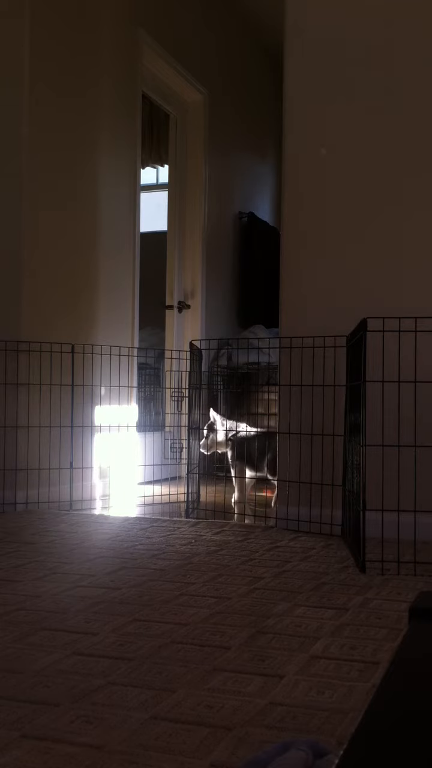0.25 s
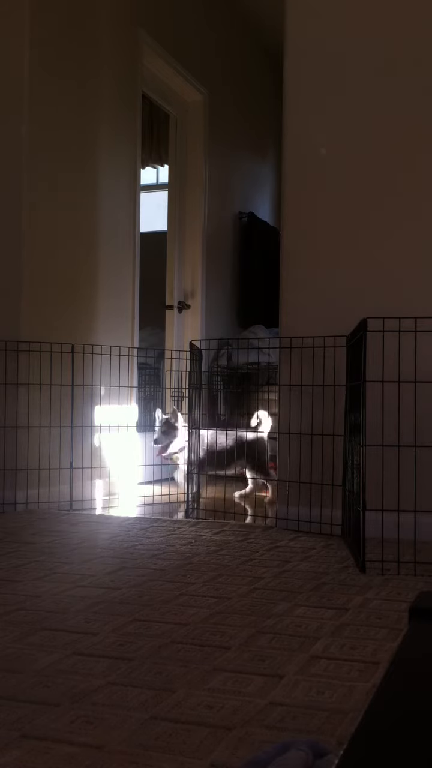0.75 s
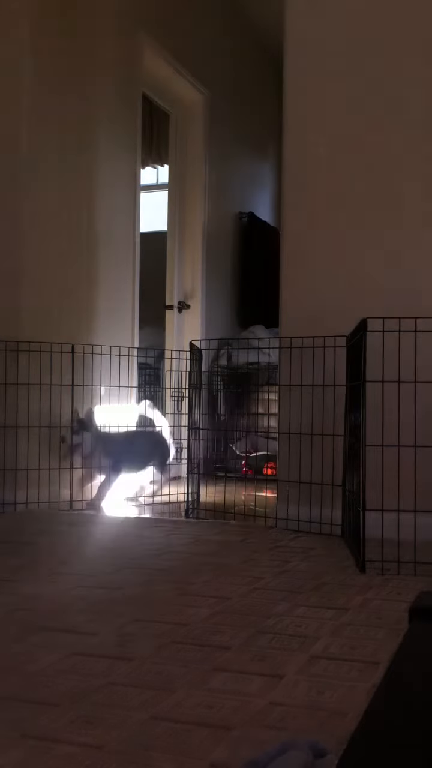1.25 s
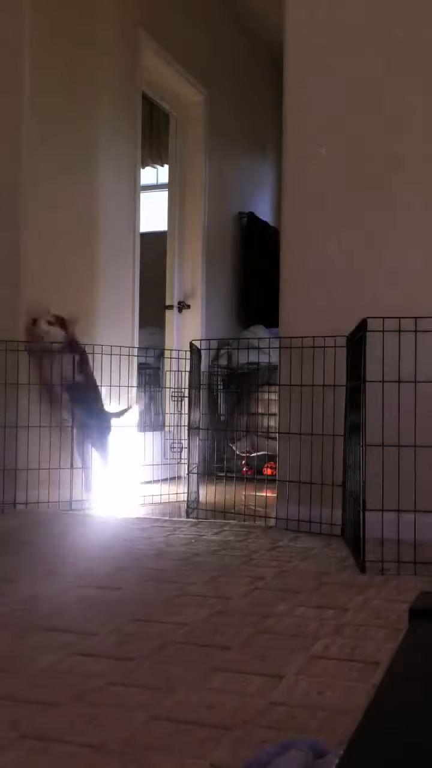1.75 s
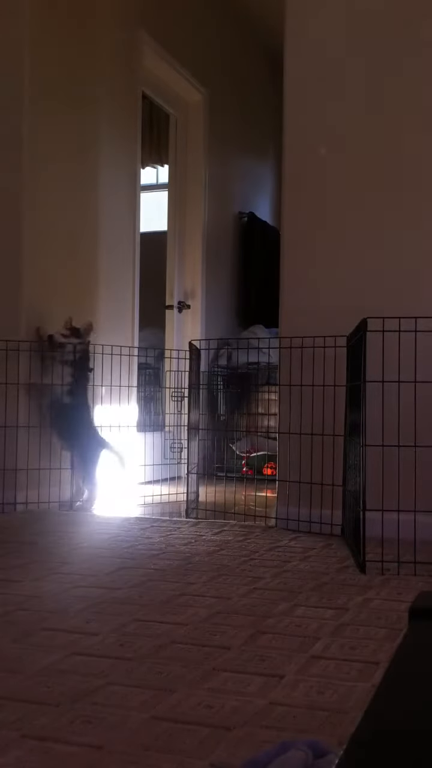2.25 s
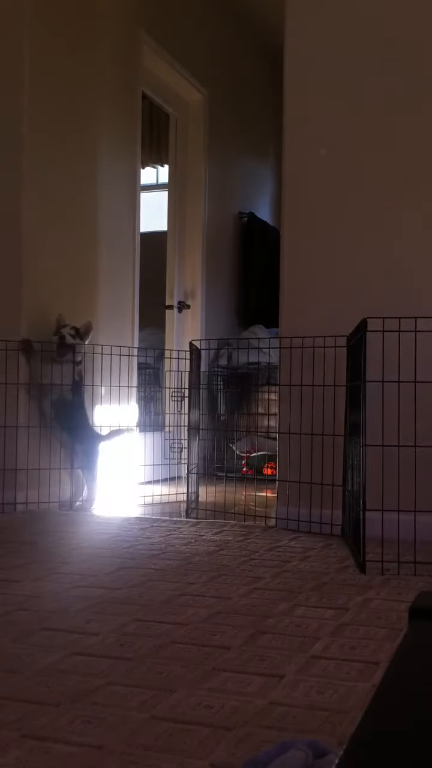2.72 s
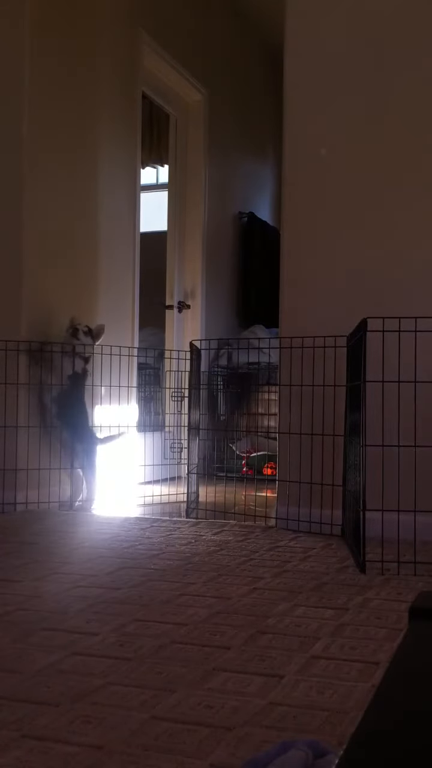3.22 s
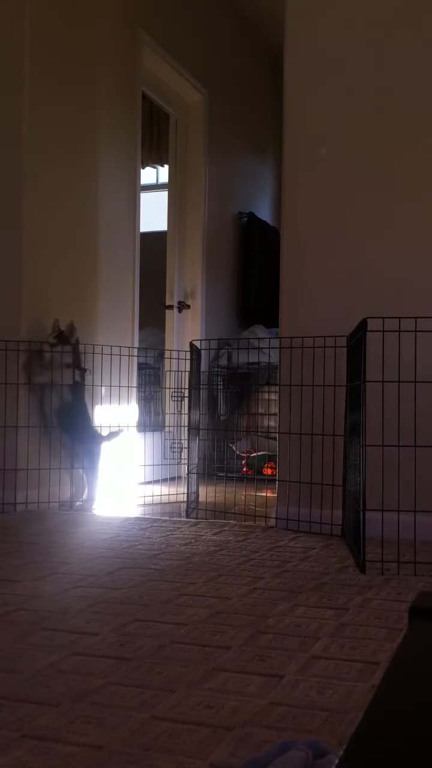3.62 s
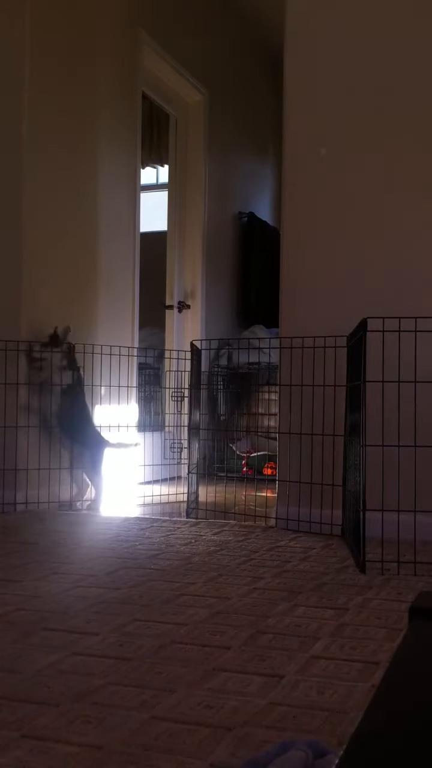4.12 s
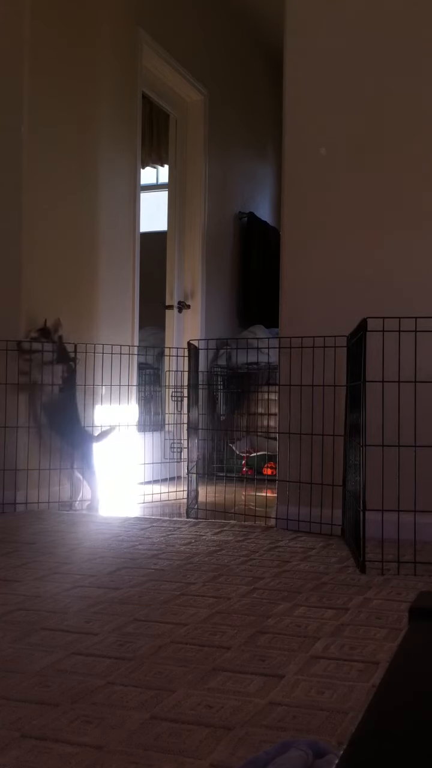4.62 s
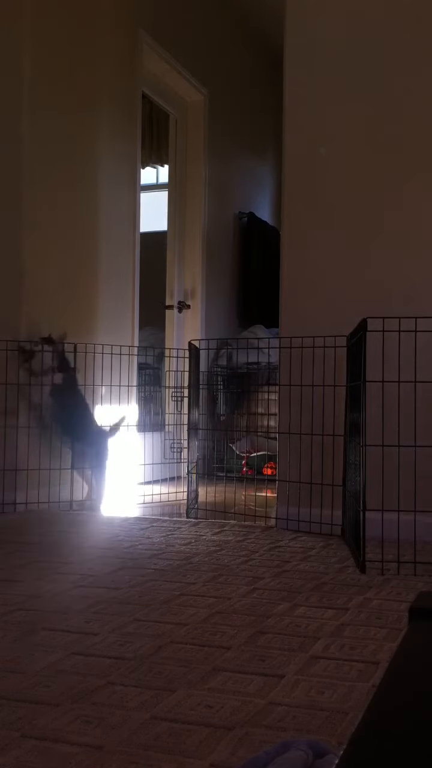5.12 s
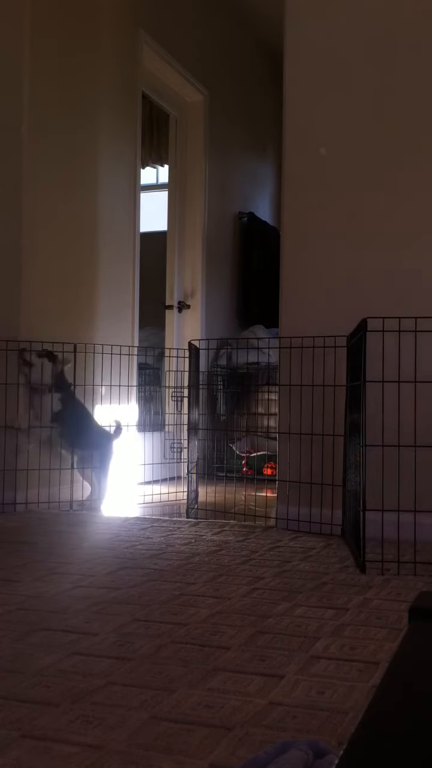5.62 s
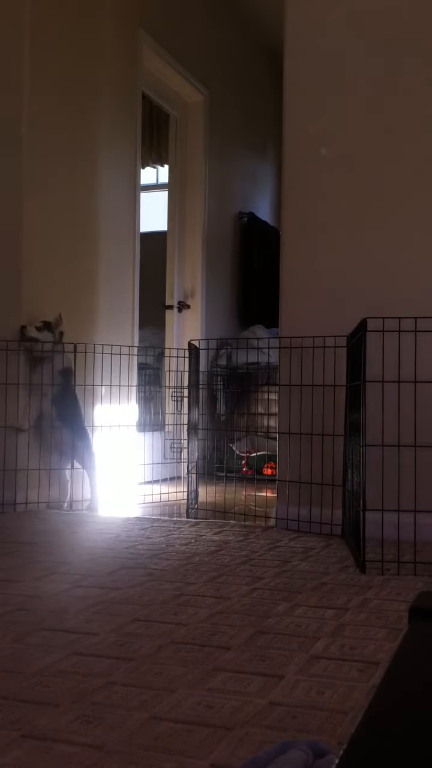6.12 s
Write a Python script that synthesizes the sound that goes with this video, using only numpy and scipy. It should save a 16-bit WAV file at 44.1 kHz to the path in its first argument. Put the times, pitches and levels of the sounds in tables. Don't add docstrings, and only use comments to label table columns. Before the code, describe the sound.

A puppy barks, yelps and whines in an echoing hard-walled hall, its claws faintly ticking on a wire pen over quiet house hum.

```python
import sys
import numpy as np
from scipy import signal
from scipy.fft import rfft, irfft
from scipy.io import wavfile
from scipy.ndimage import uniform_filter1d

SR = 44100
rng = np.random.default_rng(int(sys.argv[2]) if len(sys.argv) > 2 else 0)


def invert_db(level):
    return 10 ** (np.asarray(level, dtype=float) / 20)


def waveform_to_disk(signal):
    frames = np.transpose(np.atleast_2d(signal))
    scaled = np.clip(frames, -1, 1) * 32767
    samples = np.round(scaled).astype(np.int16)
    wavfile.write(sys.argv[1], SR, samples)


N = 280476

# frequency [Hz], gain [dB].
THROAT_GAIN = [(350, -22.5), (520, -25.5), (720, -7.5), (1050, -9.5), (1300, 6), (1800, -2.5), (2350, -6.5),
               (2850, -7.5), (3400, -5.5), (4300, -12.5), (5000, -30.5), (5900, -30), (8300, -25.5),
               (15600, -34.5)]
# start [s], length [s], start pitch [Hz], top pitch [Hz], level [dB].
BARKS = [
    (-.02, 0.16, 538.7, 632.5, -19.5),
    (0.43, .11, 437.2, 800, -28),
    (2.623, 0.061, 637, 694, -38),
    (2.852, 0.084, 480, 701, -12.5),
    (3.37, 0.064, 649.6, 715.5, -32.5),
    (3.75, 0.077, 441, 591, -40),
    (3.999, 0.095, 523, 696.5, -30.5),
    (4.671, 0.078, 562.8, 672.5, -21.5),
    (4.917, 0.14, 350.8, 749.7, -15.5),
    (5.616, .16, 329.9, 690.7, -16),
]
# roughness [0-1], mouth brightness [dB per octave],
# share of the pitch climb left after the swell [0-1].
BARK_VOICING = [(.62, 2.5, .3), (0.35, 2, .75), (1, -3.5, 0.32), (0.39, 3, 0.1045), (0.53, -2, 0.08),
                (0.53, -12.5, 0.39), (0.44, -3.5, 0.63), (0.56, 0, 0.091), (0.63, 5, .3), (0.53, 1, .45)]
# band centre [Hz], t60 [s].
HALL_DECAY = [(125, 0.97), (250, 0.97), (500, 0.18), (1000, 0.55), (2000, 0.49), (4000, 0.49), (8000, 0.5),
              (16000, 0.15)]
# frequency [Hz], level [dB], t60 [s].
STANDING_WAVES = [(767, -28.5, 0.46), (794, -28, 0.35), (1180, -31.5, 0.22), (1286, -41, 0.36),
                  (1396, -36.5, 0.3), (1472, -36, 0.59), (1540, -28.5, 0.17), (1835, -32.5, 0.51),
                  (1930, -34.5, 0.33), (2426, -29.5, 0.2), (3333, -30, 0.14)]
# frequency [Hz], density [dB per Hz].
HOUSE_SPECTRUM = [(15, -57), (30, -41.5), (70, -23), (119, -1), (240, -4), (331, -10.5), (422, -14),
                  (764, -13), (922, -14), (1000, -18.5), (2120, -20.5), (2300, -24), (15600, -37.5)]
# start [s], length [s], start pitch [Hz], end pitch [Hz], level [dB].
WHISTLES = [(0.093, 0.064, 8600, 8630, -41), (0.487, 0.016, 8600, 8750, -51),
            (1.841, 0.011, 8200, 8770, -44.5), (2.155, 0.042, 8470, 8400, -43.5),
            (2.961, 0.029, 8930, 8530, -34), (3.161, 0.045, 8230, 8920, -32.5),
            (3.181, 0.024, 8800, 9760, -52), (3.186, 0.061, 7820, 7540, -48),
            (3.417, 0.029, 8490, 8250, -37), (3.53, .07, 8400, 8600, -58), (3.786, 0.05, 8150, 8650, -50),
            (4.59, 0.041, 8270, 8400, -56), (4.732, 0.022, 7870, 9500, -41.5),
            (5.018, 0.054, 8460, 8690, -33), (5.429, 0.03, 8200, 8900, -44),
            (5.761, 0.064, 8600, 8960, -39), (6.256, 0.051, 8560, 8680, -39.5),
            (6.314, 0.028, 8750, 9170, -37)]
# start [s], length [s], level [dB], brightness [dB per octave].
CLAWS = [(1.136, 0.068, -71, -5), (1.389, 0.0043, -47, 0), (1.412, 0.038, -56.5, -1.5),
         (1.594, .04, -62.5, -5.5), (1.681, 0.043, -42.5, 0.5), (1.714, 0.072, -50, -0.5),
         (1.823, 0.039, -45.5, 2), (1.943, 0.044, -48, -1), (2.092, 0.034, -48.5, -1.5),
         (2.127, 0.12, -47, 3.5), (2.421, 0.21, -46, -3), (2.489, 0.099, -55.5, -6.5),
         (2.624, 0.15, -51, -3.5), (3.284, 0.24, -56.5, -4.5), (3.559, 0.0075, -44.5, -0.5),
         (3.67, 0.039, -50, 1.5), (3.866, 0.018, -51, -3.5), (4.143, 0.059, -52, 3),
         (4.276, 0.094, -45, -0.5), (4.552, 0.07, -55.5, -5)]
# frequency [Hz], level [dB], t60 [s].
WIRE_MODES = [(2990, -7, 0.054), (3710, -4, 0.039), (5030, 3, 0.005), (7320, 2, 0.0088),
              (11500, -27, 0.027), (13260, -28.5, 0.0092)]
# start [s], body frequency [Hz], level [dB].
PAWS = [(1.759, 208, -47.5), (1.765, 815, -55.5), (1.849, 298, -52.5), (2.145, 221, -43.5),
        (2.192, 330, -53.5), (2.435, 223, -47.5), (2.769, 280, -53), (2.931, 209, -53.5),
        (3.285, 208, -50.5), (3.566, 325, -57.5), (4.15, 191, -45), (4.581, 307, -72)]
# time [s], pitch [Hz], level [dB].
CRIES = [
    [(3.065, 1764, -45.5), (3.092, 1774, -26), (3.108, 1577, -24), (3.13, 1652, -20), (3.162, 1978, -31),
     (3.19, 2376, -36)],
    [(5.203, 1581, -16), (5.225, 1618, -18), (5.24, 1829, -22), (5.28, 1930, -26), (5.31, 1753, -21)],
    [(5.312, 1264, -20), (5.325, 1180, -15.5), (5.343, 1201, -11), (5.385, 1325, -15), (5.405, 1410, -19),
     (5.425, 1665, -37.5), (5.455, 1826, -25.5)],
    [(5.918, 1216, -38.5), (5.975, 1160, -18.5), (6.005, 1180, -24.5), (6.045, 1267, -19),
     (6.08, 1198, -25), (6.135, 1068, -23), (6.19, 1139, -21.5), (6.245, 1185, -31), (6.285, 1392, -14.5)],
]
# roughness [0-1], brightness [dB per octave].
CRY_VOICING = [(0.18, 4), (0.25, 9), (0.02, 0.5), (0.03, 0)]
# start [s], length [s], start pitch [Hz], end pitch [Hz], level [dB].
YELPS = [
    (3.421, 0.014, 1142, 1234, -24.5),
    (3.424, 0.052, 1785, 1896, -32),
    (3.801, 0.043, 1561, 1618, -34),
    (5.089, 0.073, 1830, 1430, -25.5),
    (5.158, 0.044, 1247, 1300, -16.5),
    (5.747, 0.0345, 1795, 1744, -22.5),
    (5.852, 0.095, 1326, 1362, -32.5),
    (6.27, .05, 1627, 1764, -27.5),
]
# roughness [0-1], brightness [dB per octave].
YELP_VOICING = [(0.5, -8.5), (0.49, -2), (0.3, -7), (0.16, 9), (0, 8.5), (0, -1), (0.2, 9), (0, 1)]


def curve(table, hz):
    table_hz, db = np.transpose(table)
    return np.interp(np.log(np.maximum(hz, 1)), np.log(table_hz), db)


def low_cut(f, hz, db_per_octave):
    return -db_per_octave * np.log2(np.maximum(hz / (f + 1), 1))


def high_cut(f, hz, db_per_octave):
    return -db_per_octave * np.log2(np.maximum(f / hz, 1))


def unit(x):
    return x / np.sqrt(np.mean(x ** 2))


def tinted(x, db_of):
    return irfft(rfft(x) * invert_db(db_of(np.fft.rfftfreq(len(x), 1 / SR))), len(x))


def wobble(count, rate_hz):
    width = int(SR / rate_hz)
    return unit(uniform_filter1d(uniform_filter1d(rng.standard_normal(count), width), width))


def add(track, start_s, sound):
    i = int(start_s * SR)
    track[i:i + len(sound)] += sound[:len(track) - i]


def call(rows):
    lowest_hz, highest_hz, flutter_db = 400, 5300, 9
    times_s, *columns = np.transpose(rows)
    chance = int(.6 * SR)
    t = times_s[0] + np.arange(int((times_s[-1] - times_s[0]) * SR)) / SR
    count = len(t)
    hz, db, rough, bright = (np.interp(t, times_s, c) for c in columns)
    rough = np.clip(rough, 0, 1)

    drift = 1 + .04 * rough * wobble(chance, 120)[:count]
    turns = np.cumsum(hz * drift) / SR + .12 * rough * wobble(chance, 700)[:count]
    k = np.arange(1, 31)[:, None] / 2
    overtone_hz = k * hz
    gain = invert_db(curve(THROAT_GAIN, overtone_hz) + bright * np.log2(overtone_hz / 1500))
    gain *= overtone_hz < 1.2 * highest_hz
    gain *= np.where(k % 1, .9 * rough ** 2, 1)
    flutter = np.array([wobble(chance, 39)[:count] for _ in k])
    gain *= invert_db(flutter_db * rough * np.minimum(k / 3, 1) * flutter)
    tone = (gain * np.sin(2 * np.pi * (k * turns + k * k / 7))).sum(axis=0)
    tone /= np.sqrt((gain ** 2).sum(axis=0) / 2)

    air = rng.standard_normal(chance)
    breath = unit(tinted(air, lambda f: curve(THROAT_GAIN, f) + low_cut(f, 2200, 14)))[:count]
    breath *= .5 * rough * (1 + 0.093 * np.cos(2 * np.pi * turns))
    hiss = unit(tinted(air, lambda f: np.where(f > 5700, curve(THROAT_GAIN, f), -120)))[:count]
    hiss *= invert_db(-26) * (0.32 + rough)

    edge_s = 0.0071
    shape = invert_db(db) * np.clip(np.minimum(t - times_s[0], times_s[-1] - t) / edge_s, 0, 1)
    voiced = np.pad(shape * (tone + breath), (0, 500))
    voiced = tinted(voiced, lambda f: low_cut(f, lowest_hz, 30) + high_cut(f, highest_hz, 150))
    return voiced[:count] + shape * hiss


def bark(start_s, length_s, start_hz, top_hz, db, rough, bright, climb):
    swell_s, rise, hold = .028, .35, .3
    after_s = (length_s - swell_s) * np.array([0, rise, rise + hold, 1])
    times_s = start_s + np.append(0, swell_s + after_s)
    hz = top_hz - (top_hz - start_hz) * np.array([1, climb, climb / 2, climb / 6, 0.079])
    level_db = db + np.array([-27.5, -5.5, 0, 2.5, -19])
    mouth = bright + np.array([-7.5, 0, 0, 0, 6.2])
    roughness = rough * (1 - 0.37 * (times_s - start_s) / length_s)
    return np.transpose([times_s, hz, level_db, roughness, mouth])


def hall(dry):
    build_s, direct_db = 0.0015, -2
    t = np.arange(SR) / SR
    noise = rng.standard_normal(SR)
    tail = np.zeros(SR)
    for hz, t60_s in HALL_DECAY:
        band = tinted(noise, lambda f: 20 * np.log10(np.clip(1 - np.abs(np.log2((f + 1) / hz)), 1e-5, 1)))
        tail += band * 1000. ** (-t / t60_s)
    tail *= 1 - np.exp(-t / build_s)
    power = uniform_filter1d(np.abs(rfft(tail)) ** 2, size=90)
    tail = tinted(tail, lambda f: -10 * np.log10(power + 1e-9))
    tail *= t < .8
    for hz, db, t60_s in STANDING_WAVES:
        tail += invert_db(db) * np.sin(2 * np.pi * hz * t) * 1000. ** (-t / t60_s) / 10
    tail[0] += invert_db(direct_db)
    return signal.fftconvolve(dry, tail)[:N]


def house():
    hush = tinted(rng.standard_normal(N), lambda f: curve(HOUSE_SPECTRUM, f))
    sway_db = .7 * wobble(N, 5)
    return invert_db(-58.5 + sway_db) * unit(hush)


def nose_whistle(length_s, start_hz, end_hz, db):
    u = np.linspace(0, 1, int(length_s * SR))
    hz = (start_hz + (end_hz - start_hz) * u) * (1 + .007 * wobble(SR // 4, 220)[:len(u)])
    return invert_db(db) * np.sin(np.pi * u) ** .5 * np.sin(2 * np.pi * np.cumsum(hz) / SR)


def claw(length_s, db, bright):
    t = np.arange(SR // 5) / SR
    noise, size = rng.standard_normal(len(t)), rng.exponential(1, len(t))
    ticks = unit(noise * invert_db(2.5 * size))
    ticks *= np.exp(-(t / length_s) ** 2) * np.minimum(t / (.3 * length_s), 1)
    ring = np.zeros(len(t))
    for hz, ring_db, t60_s in WIRE_MODES:
        tuned_hz = hz * (1 + 0.043 * rng.standard_normal())
        ring += invert_db(ring_db) * np.sin(2 * np.pi * tuned_hz * t) * 1000. ** (-t / t60_s)
    scrape = ticks + invert_db(-29.0) * signal.fftconvolve(ticks, ring)[:len(t)]
    return invert_db(db) * tinted(scrape, lambda f: bright * np.log2(np.maximum(f, 300) / 4000)
                            + low_cut(f, 500, 12) + high_cut(f, 11500, 14))


def paw(body_hz, db):
    t = np.arange(SR // 5) / SR
    knock = rng.standard_normal(len(t)) * np.exp(-t / 0.062) * np.minimum(t / 0.0015, 1)
    thud = tinted(knock, lambda f: -9 * np.abs(np.log2((f + 1) / body_hz)) + low_cut(f, 130, 18))
    return invert_db(db - 5.5) * unit(thud) * (t < .15)


def cry(rows, rough, bright):
    return [(*row, rough, bright) for row in rows]


def yelp(start_s, length_s, start_hz, end_hz, db, rough, bright):
    return [(start_s + length_s * u, start_hz + u * (end_hz - start_hz), db + edge_db, rough, bright)
            for u, edge_db in ((0, -7), (0.41, 0), (1, -3))]


def puppy():
    out = np.zeros(N + SR)
    calls = [bark(*row, *voicing) for row, voicing in zip(BARKS, BARK_VOICING)]
    calls += [cry(rows, *voicing) for rows, voicing in zip(CRIES, CRY_VOICING)]
    calls += [yelp(*row, *voicing) for row, voicing in zip(YELPS, YELP_VOICING)]
    for rows in calls:
        add(out, 1 + rows[0][0], call(rows))
    out = out[SR:]
    for start_s, *whistle in WHISTLES:
        add(out, start_s, nose_whistle(*whistle))
    return out


def pen():
    out = np.zeros(N)
    for start_s, *scrape in CLAWS:
        add(out, start_s, claw(*scrape))
    for start_s, *thud in PAWS:
        add(out, start_s, paw(*thud))
    return out


def scene():
    return (hall(puppy() + pen()) + house())[None]


def roll_off(x):
    return signal.sosfilt(signal.butter(12, 15730, fs=SR, output="sos"), x)


def record(dry):
    return roll_off(dry)


dry = scene()
out = record(dry)
waveform_to_disk(out)
```